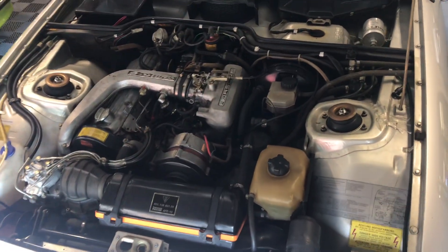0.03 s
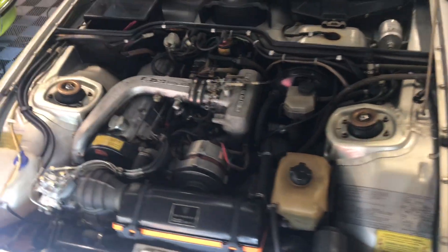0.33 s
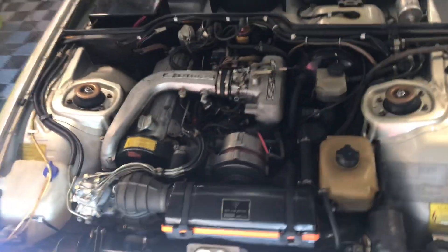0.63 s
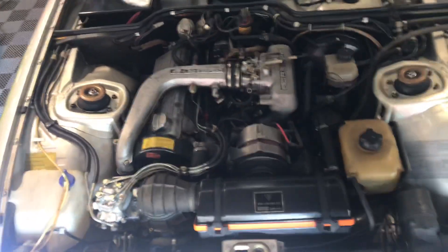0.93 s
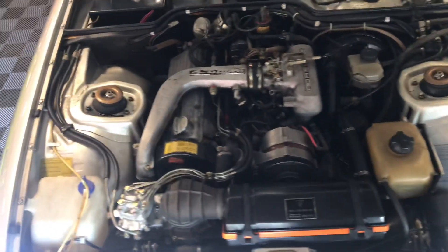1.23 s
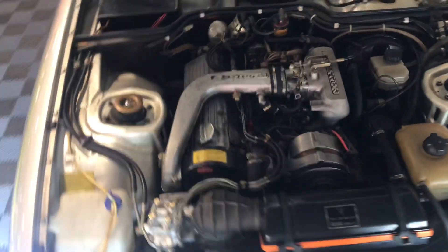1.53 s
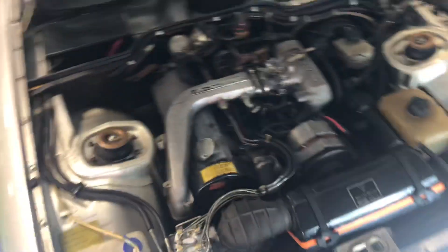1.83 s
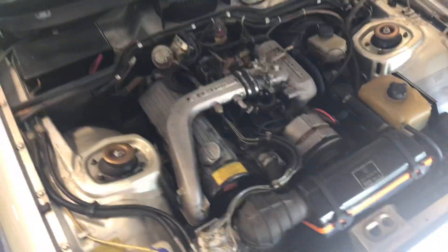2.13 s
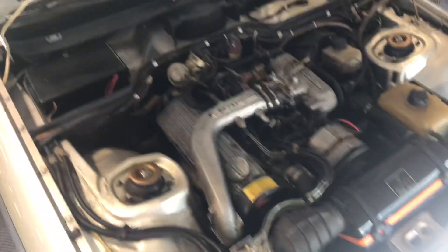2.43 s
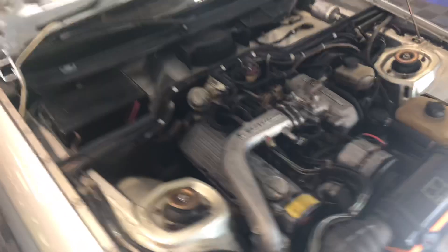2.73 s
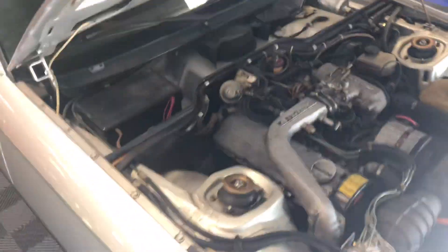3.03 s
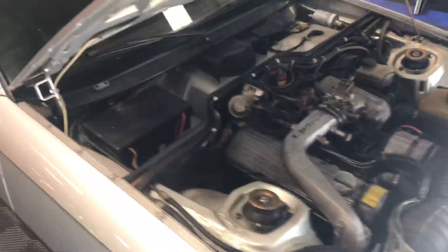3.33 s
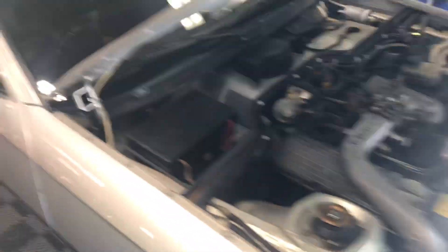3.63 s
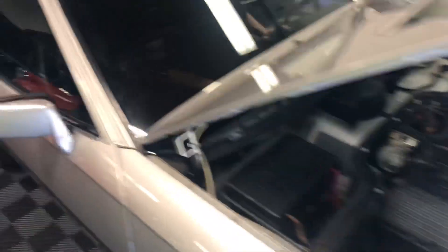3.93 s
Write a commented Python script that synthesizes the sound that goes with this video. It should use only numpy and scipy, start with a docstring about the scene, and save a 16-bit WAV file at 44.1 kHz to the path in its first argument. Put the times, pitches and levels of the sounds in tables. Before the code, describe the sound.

A petrol car engine runs at a steady fast idle, heard close beside the open hood. Its deep hum carries faint ticking, occasional small knocks and airy belt noise, then fades into a throb as the microphone moves round.

```python
"""A four-cylinder petrol engine at fast idle, heard from one microphone moving round the wing, hood open.
A deep hum at three times the firing rate gives way to the firing throb. Valves tick in a pattern that
repeats every two crank turns, and now and then a harder knock rings the block. Behind them are a fan
humming at its own speed, a thin whine, and a rush of belts and air in which metal parts ring."""
import sys
import numpy as np
from scipy import signal
from scipy.fft import rfft, irfft, next_fast_len
from scipy.io import wavfile
from scipy.ndimage import map_coordinates

SR = 44100
rng = np.random.default_rng(int(sys.argv[2]) if len(sys.argv) > 2 else 0)


def inscribe(sig):
    """Save sig as 16-bit PCM at rate SR to the path in sys.argv[1].

    A 1-D sig is mono; a 2-D sig holds one channel per row.
    Samples are clipped to [-1, 1] before scaling.
    """
    pcm = np.round(np.clip(np.atleast_2d(sig).T, -1, 1) * 32767)
    wavfile.write(sys.argv[1], SR, pcm.astype(np.int16))


N = 176400
HUM_ORDER, FIRING_ORDER = 6, 2  # cycles per crank turn
# The colour of the engine bay at the microphone. Each row: frequency in Hz, relative level in dB.
BAY_COLOUR = [(120, -25), (200, 2), (215, -6), (304, -6.5), (480, -14), (580, -12), (757, -12),
              (799, -13.5), (892, -14.5), (1010, -8.5), (1280, -5.5), (1600, -9.5), (2030, -12.5),
              (2430, -10), (2970, -13), (3310, -11.5), (4520, -13), (4950, -16.5), (5720, -14.5),
              (7660, -22), (9360, -19), (10400, -22.5), (12800, -16), (14800, -20), (15600, -20)]


def amp(db):
    """Decibels to gain."""
    return 10 ** (np.asarray(db) / 20)


def unit(x):
    """Scale to rms 1."""
    return x / np.sqrt(np.mean(x ** 2) + 1e-20)


def along(points, hz):
    """Interpolate (Hz, value) points on a log frequency axis."""
    point_hz, values = np.transpose(points)
    return np.interp(np.log(hz + 1), np.log(point_hz + 1), values)


def curves(rows):
    """One value per sample for each column after the time."""
    times, *columns = np.transpose(rows)
    return [np.interp(np.arange(N) / SR, times, column) for column in columns]


def wobble(rate):
    """A smooth random curve, rate knots a second."""
    knots = rng.standard_normal(int(N * rate / SR) + 4)
    return map_coordinates(knots, [np.arange(N) * rate / SR])


def filtered(x, response):
    """Shape x by a gain given as a function of Hz."""
    size = next_fast_len(len(x) + 8192)
    return irfft(rfft(x, size) * response(np.fft.rfftfreq(size, 1 / SR)), size)[:len(x)]


def resonance(x, hz, width):
    """x through a resonance with steep skirts, at rms 1."""
    return unit(filtered(x, lambda f: (1j * f * width / (hz * hz - f * f + 1j * f * width)) ** 2))


def tone(cycles):
    """A sine of rms 1 that starts anywhere in its cycle."""
    return np.sqrt(2) * np.sin(2 * np.pi * (cycles + rng.random()))


def shimmer(hz, width):
    """A ring of even strength whose pitch trembles over a band."""
    return tone(np.cumsum(hz + .5 * width * wobble(2 * width)) / SR)


def struck(t, t60, attack_s):
    """Envelope of a blow: a rounded rise, then a steady decay."""
    return amp(-60 * t / t60) * (1 - np.exp(-t / attack_s)) ** 2


def rippled_noise(depth_db, width_hz=130, life_s=.7):
    """Noise with the bay's many small peaks and dips, which shift as the microphone moves."""
    hz, times, spectrum = signal.stft(rng.standard_normal(N), SR, nperseg=1024)
    knots = rng.standard_normal((int(hz[-1] / width_hz) + 2, int(times[-1] / life_s) + 2))
    grid = np.meshgrid(hz / width_hz, times / life_s, indexing="ij")
    ripple = amp(depth_db * np.tanh(map_coordinates(knots, grid)))
    return unit(signal.istft(spectrum * ripple, nperseg=1024)[1][:N])


def belt_and_air_rush(level_db=-30, flutter_db=.48, grain_db=1.1):
    """Belts and moving air: a finely grained noise coloured by the engine bay."""
    # Tilt of the rush. Each row: frequency in Hz, dB over the bay's colour.
    tilt = [(20, -5), (200, -1.5), (450, 2), (1200, 0), (4000, 1.5), (9000, 0), (15000, -4)]
    air = rippled_noise(depth_db=3) * amp(flutter_db * wobble(60) + grain_db * wobble(900))
    colour = lambda f: amp(along(BAY_COLOUR, np.maximum(f, 220)) + along(tilt, f))
    return amp(level_db) * unit(filtered(air, colour))


def ringing_parts(turns, uneven_db=1.5):
    """Covers, pipes and pulleys, shaken unevenly at each firing, come and go as the microphone moves."""
    # The parts' narrow resonances, each in Hz.
    pitches = [300, 1000, 1330, 1587, 1897, 2830, 3045, 4030, 4535, 5835]
    # How each rings. Each row: width in Hz, swing at each firing in dB, (seconds, level in dB) points.
    parts = [(85, 1, [(0, -45), (1.2, -60), (2.2, -45), (2.6, -39.5), (3.2, -45), (4, -49)]),
             (197, 1.7, [(0, -44.5), (1, -45), (2, -40.5), (3, -52)]), (203, 2.3, [(0, -39.5), (.9, -38),
             (1.7, -51), (2.7, -43.5), (4, -43.5)]), (65, 1.4, [(0, -58), (3.22, -52), (3.38, -36),
             (3.65, -38.5), (3.8, -33), (4, -35.5)]), (50, 1.2, [(0, -44), (1, -45.5), (2, -51), (4, -46)]),
             (140, 2.2, [(0, -42), (.6, -57), (2.5, -49), (2.78, -37.5), (3, -44), (4, -49)]),
             (60.4, 2.5, [(0, -40), (1.2, -46), (2.7, -46), (4, -42)]), (161, 5.1, [(0, -50), (2.8, -43),
             (3.1, -58), (3.55, -39), (4, -47)]), (80, 5, [(0, -58), (.5, -37), (.9, -50), (1.9, -43),
             (2.6, -52), (3.1, -41), (3.8, -54)]), (130, 0.89, [(0, -58), (.35, -56), (.62, -42),
             (1.2, -51), (1.76, -36.5), (1.9, -51), (4, -50)])]
    firing = np.cos(2 * np.pi * FIRING_ORDER * turns)
    out = np.zeros(N)
    for hz, (width, swing_db, levels) in zip(pitches, parts):
        shake = unit(amp(swing_db * firing + uneven_db * wobble(35)))
        ring = resonance(rng.standard_normal(N), hz, 1.5 * width)  # 1.5 offsets the steep skirts
        out += amp(curves(levels)[0]) * shake * ring
    return out


def whine(hz=817.3, waver_db=1):
    """A thin, slightly unsteady tone far behind the engine's hum."""
    # The whine at the microphone. Each row: time in seconds, level in dB.
    levels = [(0, -50), (.7, -45.5), (1.2, -49.5), (2.3, -48.5), (4, -55)]
    gain = amp(curves(levels)[0] + waver_db * wobble(6.8))
    return gain * tone(np.cumsum(hz + wobble(3.98)) / SR)


def fan():
    """A fan hums at its own speed and at three times that."""
    # The fan's rotation. Each row: time in seconds, speed in Hz, level in dB.
    rotation = [(0, 62.15, -30.5), (.8, 62.9, -29.5), (1.55, 63.7, -31.5), (2.45, 63.85, -31),
                (3.2, 62.7, -36), (4, 62.9, -40)]
    # Its third harmonic. Each row: time in seconds, level in dB.
    third_levels = [(0, -35), (1, -39.5), (2.2, -50), (3, -39.5), (4, -35)]
    hz, db = curves(rotation)
    turns = np.cumsum(hz) / SR
    third = amp(curves(third_levels)[0]) * tone(3 * turns)
    return amp(db) * tone(turns) + third


def block_knocks(t60=.054, attack_s=.0013):
    """Now and then one beat of the cycle knocks harder and rings the block."""
    # The knocks. Each row: start in seconds, relative level in dB.
    blows = [(.176, -30), (.358, -29), (.632, -28.5), (.818, -29.5), (.909, -25), (1.089, -28),
             (1.185, -31), (2.305, -28.5), (2.398, -31), (2.488, -29.5), (2.579, -30), (2.766, -28.5),
             (2.858, -31)]
    # The block's modes. Each row: frequency in Hz, width in Hz, relative level in dB.
    modes = [(1170, 160, -7), (1445, 140, 0), (1645, 260, 2), (2720, 610, -2)]
    t = np.arange(N) / SR
    envelope = sum(amp(db) * struck(np.maximum(t - start, 0), t60, attack_s) for start, db in blows)
    block = unit(sum(amp(db) * shimmer(hz, width) for hz, width, db in modes))
    return 2 * envelope * block


def valve_ticks(turns, level_db=-34, scatter_db=1.3, jitter_s=.0006, fade_db=10, passing_s=.51):
    """Each tappet clicks once in two turns; its ring stands out while the microphone passes near it."""
    # The tappets. Each row: place in the cycle from 0 to 1, relative level in dB, its drift in dB per
    # second as the microphone moves, 60 dB decay in seconds, ring pitch in Hz, ring width in Hz,
    # ring over click at closest in dB, time in seconds when the microphone is closest.
    tappets = [(.13, -6, 0.95, 0.047, 14300, 1100, -1, 3.8), (.17, -4, 1, 0.04, 9190, 700, 1, 2.35),
               (.2, -5, 0, .09, 2399, 109.8, 0.5, 1), (.38, -6, 0.8, 0.052, 14400, 1100, -3.5, 3.2),
               (.46, -6, 0.84, 0.072, 3093, 251, -4, 3.9), (.645, -6.5, -0.3, 0.086, 13700, 2000, -5, 3.7),
               (.745, -8, 1, 0.057, 4230, 109.8, -3, 3.55), (.9, -1, -1, 0.043, 9410, 1490, -1, 0.51),
               (.955, -1.5, 0, 0.051, 2850, 250.7, -1, 1.54), (.975, -7, 0, 0.067, 4506, 79.7, 5, 3.1)]
    # Tilt of the clicks. Each row: frequency in Hz, dB over the bay's colour.
    tilt = [(300, -19), (1200, -6.5), (4000, 3), (9000, 6.5), (15000, 0)]
    colour = lambda f: amp(along(BAY_COLOUR, f) + along(tilt, f))
    t = np.arange(N) / SR
    cycles = turns / 2
    ticks = np.zeros(N)
    for place, db, drift_db, t60, hz, width, ring_db, closest_s in tappets:
        due = np.interp(np.arange(place, cycles[-1], 1), cycles, np.arange(N))
        jitter, scatter = rng.standard_normal((64, 2))[:len(due)].T
        onsets = np.clip(due + jitter_s * SR * jitter, 0, N - 1).astype(int)
        blows = np.bincount(onsets, amp(db + drift_db * onsets / SR + scatter_db * scatter), N)
        envelope = signal.fftconvolve(blows, struck(t[:SR // 8], t60, attack_s=.0042))[:N]
        click = unit(filtered(rippled_noise(depth_db=7), colour))
        away = 1 - 1 / (1 + ((t - closest_s) / passing_s) ** 2)
        ring = amp(ring_db - fade_db * away) * shimmer(hz, width)
        ticks += envelope * (click + ring)
    return amp(level_db) * unit(ticks)


def engine_drone(turns, waver_db=.5, weak_waver_db=2):
    """The deep hum, the firing throb and weaker orders, all locked to the crank."""
    # The drone at the microphone. Each row: time in seconds, hum level in dB, throb level in dB.
    levels = [(0, -17.5, -36), (.25, -17, -28), (.8, -15, -40), (1.25, -14.5, -33), (1.8, -14, -38),
              (2.3, -15.5, -37), (2.8, -17.5, -28), (3.3, -19, -27.5), (4, -27, -23)]
    # The weaker engine orders. Each row: multiple of the crank speed, level in dB.
    weak_orders = [(2.5, -44), (3, -41), (4, -45), (5, -46.5), (5.5, -49.5), (6.5, -53), (7.5, -44.5),
                   (8, -42), (10, -51.5), (12, -55.5)]
    hum_db, throb_db = curves(levels)
    hum = amp(hum_db + waver_db * wobble(8.24)) * tone(HUM_ORDER * turns)
    throb = amp(throb_db + waver_db * wobble(8)) * tone(FIRING_ORDER * turns)
    weak = sum(amp(db + weak_waver_db * wobble(4.08)) * tone(order * turns) for order, db in weak_orders)
    return hum + throb + weak


def scene():
    """The whole engine bay at one microphone beside the open hood."""
    # The wandering idle. Each row: time in seconds, crank speed in rpm.
    idle_speed = [(0.0, 1325), (0.25, 1326), (0.6, 1313), (0.88, 1299), (1.05, 1310), (1.22, 1315),
                  (1.45, 1286), (1.62, 1272), (1.85, 1291), (2.1, 1277), (2.3, 1282), (2.58, 1301),
                  (2.8, 1293), (3.4, 1290), (3.7, 1299), (4.0, 1308)]
    turns = np.cumsum(curves(idle_speed)[0]) / 60 / SR
    tones = engine_drone(turns) + fan() + whine()
    impacts = valve_ticks(turns) + block_knocks()
    background = belt_and_air_rush() + ringing_parts(turns)
    return (tones + impacts + background)[None]


def record(dry, top_hz=15750):
    """The recorder keeps nothing above its band limit."""
    return np.array([filtered(channel, lambda hz: hz < top_hz) for channel in dry])


dry = scene()
out = record(dry)
inscribe(out)
```